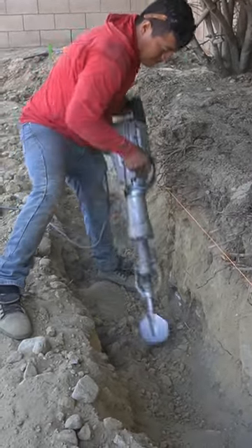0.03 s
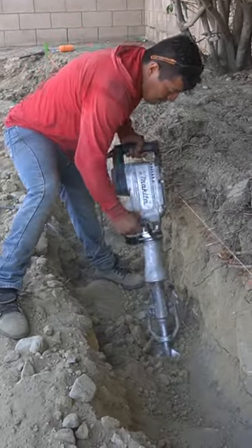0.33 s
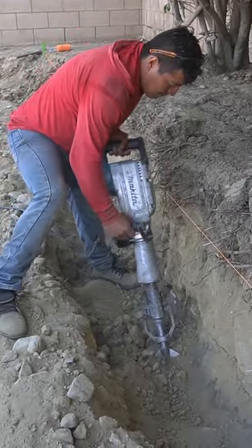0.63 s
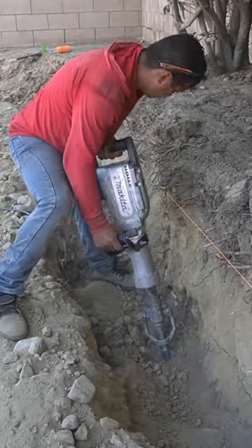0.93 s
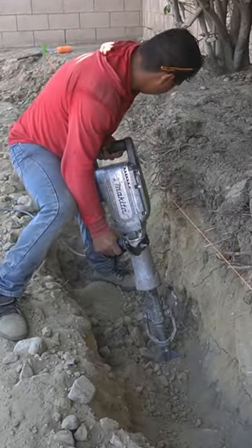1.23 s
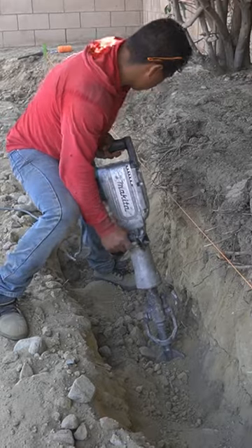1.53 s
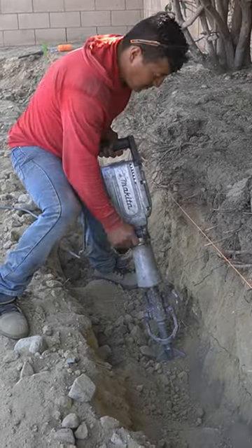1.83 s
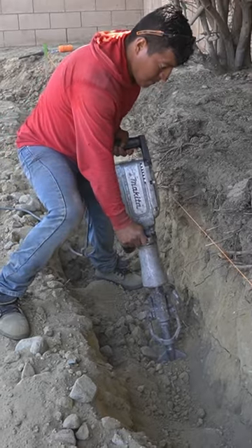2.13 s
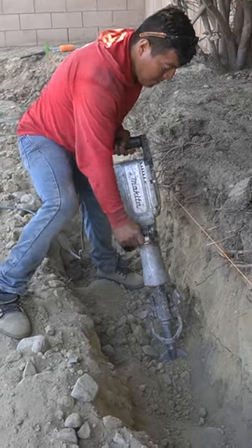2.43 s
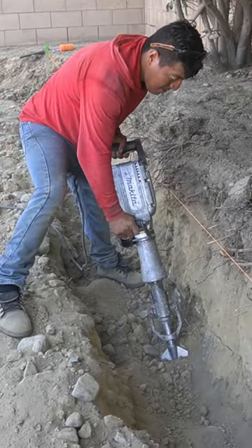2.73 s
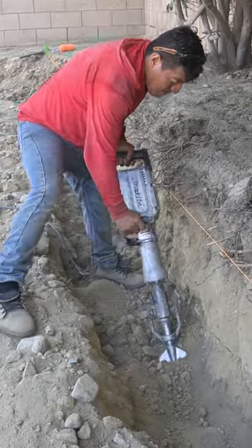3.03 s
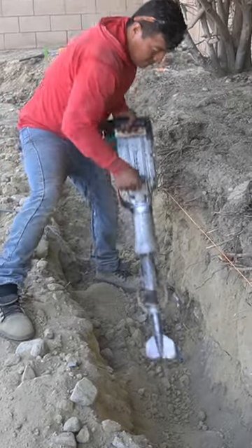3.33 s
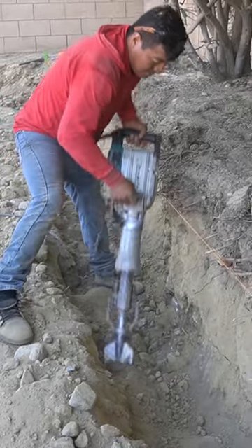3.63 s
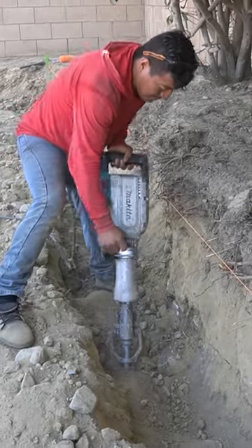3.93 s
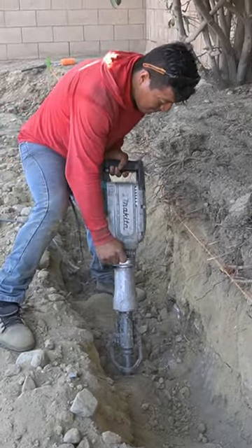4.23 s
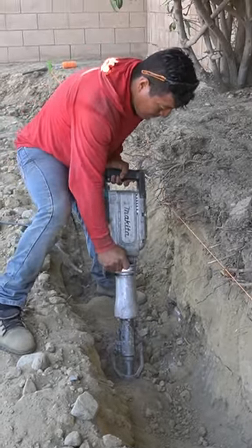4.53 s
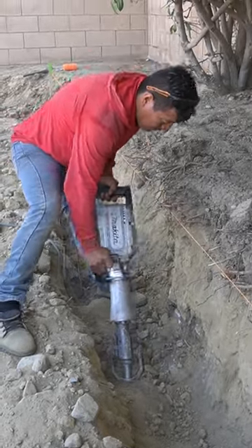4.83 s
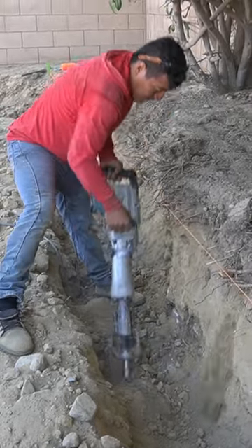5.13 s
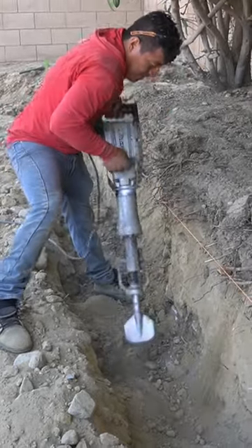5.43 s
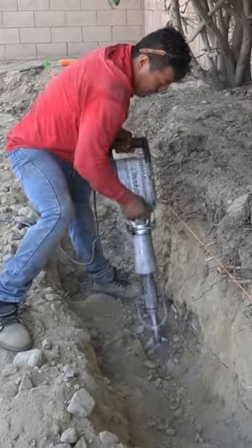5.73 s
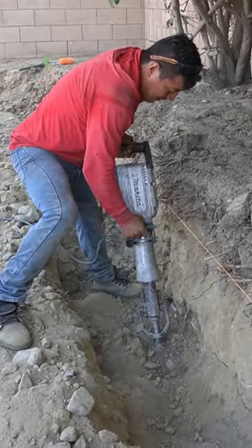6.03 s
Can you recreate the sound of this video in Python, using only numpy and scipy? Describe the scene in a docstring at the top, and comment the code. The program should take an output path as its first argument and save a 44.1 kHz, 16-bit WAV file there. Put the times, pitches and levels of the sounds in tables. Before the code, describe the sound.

An electric demolition hammer works close by in an outdoor trench, its motor rushing and whining over a low hum, perhaps a generator. From about 0.2 seconds it drives a steel spade into the soil at roughly twenty blows a second, each combining a sharp crack from the casing, a high metallic ring and a dull earthy thud. Near 3.3 seconds the spade clinks and the lifted hammer only clacks. Digging resumes at 3.7 seconds with softer thuds and a more damped ring. After 4.7 seconds the motor coasts through a few stray blows and clinks, and a flung clod lands with a hollow thump at about 5.1 seconds. The hammer then clacks rapidly in the air over a hollow roar and a stronger whine, before biting back into the ground at 5.7 seconds and pounding until the end, around 6 seconds.

```python
"""An electric demolition hammer rushes and whines over a hum, perhaps a generator's, then drives a steel
spade into a trench, about twenty blows a second: each cracks in the housing, rings the bit and thuds in
the soil. Near 3.3 s the spade clinks and the lifted hammer only clacks; from 3.7 s it digs again. After
4.7 s the motor coasts through stray blows and clinks, a flung clod lands, and the hammer clacks in the
air over a hollow roar before biting back in at 5.7 s."""
import sys
import numpy as np
from scipy import signal
from scipy.fft import rfft, irfft, next_fast_len
from scipy.io import wavfile
from scipy.ndimage import uniform_filter1d, minimum_filter1d, map_coordinates

SR = 44100
rng = np.random.default_rng(int(sys.argv[2]) if len(sys.argv) > 2 else 0)


def pcm_store(signal):
    """Save signal as 16-bit PCM."""
    levels = np.round(np.clip(np.atleast_2d(signal), -1, 1) * 32767)
    wavfile.write(sys.argv[1], SR, levels.astype(np.int16).T)


N = 267687
CLOCK = np.arange(N) / SR
AGE = np.arange(SR // 5) / SR  # time since an impact [s]

# Levels are relative: each layer adds its own trim.
# motor under changing load: (time [s], rush level [dB], gear whine pitch [Hz], whine level [dB])
MOTOR_CURVE = [(0, -26.5, 2625, -42), (.5, -31, 2123, -36), (2.5, -34.5, 2190, -45), (3.3, -38, 2350, -37),
               (3.66, -34, 2680, -46), (3.8, -35, 2393, -37), (4.55, -31.5, 2454, -37.5),
               (4.75, -41, 2320, -58), (4.94, -47, 2214, -49), (5.06, -34, 2255, -46),
               (5.28, -33.5, 2305, -28.5), (5.42, -33.5, 2336, -37), (5.66, -30, 2680, -41),
               (5.9, -31, 2430, -63)]
# fader rides for the nearby machine and the hollow roar: (time [s], level [dB])
HUM_LEVEL = [(.14, -37.5), (.28, -44), (.7, -51.5), (1.1, -46), (3.2, -48), (3.7, -42.5), (3.85, -47),
             (4.1, -41.5), (4.55, -44.5), (4.8, -40.5), (5.72, -36), (5.78, -48), (6.05, -41)]
ROAR_LEVEL = [(.15, -38.5), (.4, -54), (5.2, -55.5), (5.4, -44), (5.72, -42), (5.8, -67)]
# the hum's harmonics, from the fundamental up: (level [dB])
HUM_HARMONICS = [-14.5, -1, -20, -17.5]
# noise colours: (frequency [Hz], spectral level [dB])
FAN_EQ = [(150, -10), (650, -11), (1200, 1), (2400, 7.5), (3500, 7), (6500, 3.5), (10000, -4), (16000, -44)]
ROAR_EQ = [(400, -16), (610, 3), (850, -5), (1300, -11)]
RUMBLE_EQ = [(20, -60), (85, -2.5), (200, 0), (400, -14.5), (4000, -38)]
CLACK_EQ = [(150, -23), (650, 0), (1100, -6), (3700, -5.5), (5300, 6), (6000, -5.5), (6800, 3.5),
            (9500, -3.5), (16000, -10.5)]
CRACK_EQ = [(1200, -43), (2400, 4.5), (3600, 13.5), (5400, 10.5), (6800, 5), (8000, 11), (10500, 4),
            (12500, 10), (14000, -6), (16000, 11.5)]
CLANK_EQ = [(150, -21), (400, -12), (700, -8), (950, -3), (1200, -5.5), (1800, 3.5), (2300, 3.5),
            (3500, -7.5)]
SIZZLE_EQ = [(3000, -23.5), (3900, -1.5), (5700, -44), (6450, 13), (7400, -12), (11900, -9.5), (12500, 6),
             (13700, -10.5)]
# stereo image of all the noises: (frequency [Hz], left-right correlation [0..1])
STEREO_LIKENESS = [(100, 0.99), (1000, 0.96), (5000, 0.79)]

# striker tempo, one list per spell lifted or digging: (time [s], rate [strokes/s])
LIFTED_TEMPO = [
    [(.004, 25.6), (.06, 25.6)],
    [(3.349, 21.0), (3.66, 20.25)],
    [(5.152, 15.92), (5.24, 18.4), (5.45, 20.77), (5.59, 20.55)],
]
DIGGING_TEMPO = [
    [(.203, 27.55), (.248, 26.83), (.418, 22.07), (.598, 20.47), (1.3, 20.24), (1.45, 21.14), (1.55, 20.23),
     (3.27, 20.23)],
    [(3.718, 22.81), (4.05, 20.47), (4.53, 20.28), (4.66, 17.55)],
    [(5.74, 23.98), (5.95, 20.94), (6.07, 20.56)],
]
# clacks with the bit lifted: (time [s], level [dB])
CLACK_LEVEL = [(0, -51), (3.35, -23.5), (3.5, -17.5), (3.59, -28.5), (5.15, -18), (5.45, -15)]
# weight of the digging blows: (time [s], crack level [dB], ring level [dB])
BLOW_FORCE = [(.2, -15.5, -14), (.9, -26, -16.5), (1.08, -18, -14.5), (1.42, -16, -17),
              (1.52, -18.5, -11.5), (1.63, -19.5, -19), (2.08, -24, -16.5), (2.46, -21, -14.5),
              (2.74, -22, -15), (2.9, -22, -27), (3.1, -21, -21.5), (3.76, -22, -17.5),
              (4.08, -22.5, -18.5), (4.64, -20, -16.5), (5.8, -23, -18.5), (5.92, -20.5, -21.5)]
# stray blows as the bit catches, slips free or the motor coasts:
# (time [s], crack level [dB], clank level [dB], ring level [dB], upper-mode gain [dB], free time [s])
STRAY_BLOWS = [(.131, -24, -28, -28.5, 3, 0.049), (0.169, -23, -19, -21, 9.5, 0.0084),
               (3.291, -23.5, -27.5, -31.5, 13.5, 0.08), (3.676, -23.5, -29, -35, 4, 0.046),
               (4.698, -17.5, -22, -19.5, 7, 0.012), (4.774, -25, -24.5, -16, -4, 0.0085),
               (4.786, -30, -28.5, -28, 4, 0.014), (4.864, -26, -25.5, -10.5, -19, 0.002),
               (4.881, -27, -33, -23, -20, 0.003), (4.982, -27, -28.5, -27, -17, 0.0087),
               (5.083, -20, -23, -24.5, -3, 0.069), (5.686, -13, -19.5, -22.5, 7.5, 0.058),
               (5.712, -24, -26, -32, -5, 0.016)]

# modes of the steel bit, one list each for (family, pitch [Hz], level [dB], t60 [s])
MODE_FAMILY = "minor minor minor main main main main main minor minor upper upper upper minor".split()
MODE_HZ = [3629, 4325, 4753, 5151, 6157, 6437, 6700, 8524, 8940, 11700, 12230, 12332, 12572, 14460]
MODE_DB = [-14, -24, -28, -20.5, 0, -9.5, -26, -17, -15.5, -18, -15.5, -3.5, -19.5, -25]
MODE_T60 = [0.15, 0.52, 0.85, 0.23, 0.64, 0.35, 0.18, 0.4, 0.28, 0.53, 0.31, 0.24, 0.29, 0.49]
# how hard the striker excites the upper modes: (time [s], gain [dB])
UPPER_GAIN = [(.2, 0.5), (.33, -12), (.6, -1.5), (.81, 6), (1.02, -2.5), (1.5, -7.5), (1.65, 5), (2.1, 0),
              (2.78, 2), (2.95, 13.5), (3.72, 9.5), (3.9, -0.5), (4.35, 0), (4.45, 1.5), (4.6, -4.5),
              (5.9, 6)]
# the minor modes fade when the spade is buried: (time [s], gain [dB])
MINOR_GAIN = [(.2, -3.5), (1.35, -1), (2.7, 0.5), (2.92, 4), (3.2, 7.5), (3.9, -6), (4.7, -15), (5.08, 3),
              (5.8, -6)]
# the tool's angle brings out one mode: (time [s], half-width [s], pitch [Hz], gain [dB])
MODE_SWELLS = [(.84, 0.049, 4750, 21), (1.247, 0.22, 5150, 13), (2.5, 0.063, 5150, 11),
               (5.08, 0.067, 8520, 12), (5.91, 0.059, 5150, 15)]
# packed soil damps all but the upper family: (time [s], extra decay [dB/s])
SOIL_DAMPING = [(.8, 0), (1.6, 53), (3.3, 52), (4.0, 220), (4.9, 420), (5.08, 110)]
# how long the bit rings before it seats: (time [s], free time [s])
FREE_TIME = [(.2, 0.11), (.44, 0.043), (.52, 0.036), (1.45, 0.035), (1.65, 0.032), (2.2, 0.027),
             (2.45, 0.041), (2.7, 0.022), (3.0, 0.029), (3.15, 0.042), (3.9, 0.028), (4.64, 0.031),
             (5.8, 0.029)]
# the seated bit stiffens and bends sharp, most in hard crust: (time [s], typical pitch rise [Hz])
SEAT_BEND = [(.8, 500), (1.05, 120), (4.0, 50)]
# the ring pans as the tool turns: (time [s], left minus right [dB])
RING_PAN = [(2.7, -5), (3.8, 3.5), (5.0, 1)]
# the bit pings higher while the striker touches it: (time [s], level [dB])
PING_LEVEL = [(2.5, 19), (5.6, 9.5), (5.75, 24)]
# the spade's push on the ground: (time [s], level [dB])
THUD_LEVEL = [(.14, -41), (.21, -26.5), (1.1, -21), (3.0, -21.5), (3.255, -21.5), (3.285, -43), (3.75, -35),
              (4.5, -29.5), (6.0, -29.5)]
# clinks of the loose spade: (time [s], pitch [Hz], level [dB], t60 [s])
SPADE_CLINKS = [(3.244, 3580, -25, 0.13), (3.29, 3100, -22, 0.042), (4.862, 1760, -17.5, 0.032),
                (5.082, 2550, -14.5, 0.033), (5.084, 3800, -12, 0.021)]


def amp(db):
    """Decibels to gain."""
    return 10 ** (np.asarray(db) / 20)


def unit(x):
    """Scale to rms 1."""
    return x / np.sqrt(np.mean(x ** 2) + 1e-20)


def along(points, hz):
    """Read a curve along a log frequency axis."""
    frequencies, values = np.transpose(points)
    return np.interp(np.log(hz + 1), np.log(frequencies + 1), values)


def at(rows, s, column=1):
    """Read one column of a curve at the times s."""
    columns = np.transpose(rows)
    return np.interp(s, columns[0], columns[column])


def wobble(rate, size=N):
    """Smooth random modulation, rate knots a second."""
    return map_coordinates(rng.standard_normal(int(size * rate / SR) + 4), [np.arange(size) * rate / SR])


def filtered(x, response):
    """Equalise x with a gain for each frequency."""
    size = next_fast_len(N + SR // 2)
    return irfft(rfft(x, size) * response(np.fft.rfftfreq(size, 1 / SR)), size)[..., :N]


def noise(eq, patchy_db):
    """Stereo noise of rms 1 whose colour shifts from moment to moment."""
    def mid_side_gain(hz):
        width = np.arccos(np.clip(along(STEREO_LIKENESS, hz), -1, 1)) / 2
        return amp(along(eq, hz)) * [np.cos(width), np.sin(width)]

    white = signal.stft(rng.standard_normal((2, N)), nperseg=512)[2]
    patches = uniform_filter1d(rng.standard_normal(white.shape[1:]), size=5, axis=0)
    patches = unit(uniform_filter1d(patches, size=6, axis=1))
    pair = signal.istft(white * amp(patchy_db * patches), nperseg=512)[1][:, :N]
    mid, side = filtered(pair, mid_side_gain)
    return unit(np.array([mid + side, mid - side]))


def add(track, s, sound):
    """Mix a sound into a track at time s."""
    start = int(np.clip(round(s * SR), 0, N - 1))
    track[..., start:start + sound.shape[-1]] += sound[..., :N - start]


def hit(db, rise, t60, t=AGE):
    """Percussive envelope: fast attack, exponential decay."""
    return amp(db - 60 * t / t60) * (1 - np.exp(-t / rise))


def bursts(times, levels, rise, t60, tail_db, tail_t60):
    """Envelope of impacts: each a quick burst, then a weaker scatter from the trench."""
    power = np.zeros(N)
    shape = hit(0, rise, t60) + hit(tail_db, rise, tail_t60)
    for s, db in zip(times, levels):
        add(power, s, (amp(db) * shape) ** 2)
    return np.sqrt(power)


def motor(rush_db, whine_db, whine_width_hz, chatter_db, hiss_hz=3500, dull_below_db=-31):
    """Fan air chopped by gear chatter, duller when coasting, and a fuzzy whine that sags under load."""
    air, level_db = noise(FAN_EQ, patchy_db=3.0), at(MOTOR_CURVE, CLOCK)
    hiss = filtered(air, lambda hz: hz ** 4 / (hz ** 4 + hiss_hz ** 4))
    air = air - hiss * (1 - amp(np.minimum(0, level_db - dull_below_db)))
    rush = amp(level_db + rush_db + chatter_db * wobble(240)) * air
    whine_hz = at(MOTOR_CURVE, CLOCK, column=2) + whine_width_hz * wobble(350)
    whine_gain = amp(at(MOTOR_CURVE, CLOCK, column=3) + whine_db + 4.1 * wobble(24.88))
    return rush + whine_gain * np.sin(2 * np.pi * np.cumsum(whine_hz) / SR)


def vents(patchy_db):
    """Air, probably from the vents, roars in a hollow band while the motor runs free."""
    return amp(at(ROAR_LEVEL, CLOCK)) * noise(ROAR_EQ, patchy_db)


def hum(hz, tone_db, rumble_db):
    """A machine drones at a nearly steady speed over a low rumble that swells less than it does."""
    phase = 2 * np.pi * np.cumsum(hz * (1 + 0.00364 * wobble(3.95))) / SR
    tone = sum(amp(db + wobble(11.0)) * np.sin(k * phase + rng.uniform(0, 2 * np.pi))
               for k, db in enumerate(HUM_HARMONICS, 1))
    level_db = at(HUM_LEVEL, CLOCK)
    rumble = amp(level_db / 2 + rumble_db) * noise(RUMBLE_EQ, patchy_db=0.5)
    return amp(level_db + tone_db) * tone + rumble


def strokes(spells):
    """Stroke times: one for each turn of the crank."""
    times = []
    for tempo in spells:
        t = np.arange(tempo[0][0], tempo[-1][0], 1 / SR)
        turns = np.cumsum(at(tempo, t)) / SR
        times.append(np.interp(np.arange(np.ceil(turns[-1])), turns, t))
    return np.concatenate(times)


def idle_strokes(scrape_db, snap_db):
    """With no load the striker scrapes into its catch and stops with a snap."""
    s = strokes(LIFTED_TEMPO)
    db = at(CLACK_LEVEL, s)
    scrape = bursts(s, db + scrape_db, rise=0.0013, t60=0.014, tail_db=-17.0, tail_t60=0.17)
    snap = bursts(s + 0.00274, db + snap_db, rise=.0001, t60=0.0044, tail_db=-42, tail_t60=.02)
    return np.hypot(scrape, snap) * noise(CLACK_EQ, patchy_db=1.0)


def hammering(clank_db, crack_scatter_db, ring_scatter_db, free_scatter):
    """Cue list of all blows, laid out like STRAY_BLOWS; no two steady ones land quite alike."""
    s = strokes(DIGGING_TEMPO)
    hardness, liveliness, seating = rng.standard_normal((len(s), 3)).T
    crack = at(BLOW_FORCE, s) + crack_scatter_db * hardness
    ring = at(BLOW_FORCE, s, column=2) + ring_scatter_db * liveliness
    free_s = at(FREE_TIME, s) * np.exp(free_scatter * seating)
    steady = np.column_stack([s, crack, crack + clank_db, ring, at(UPPER_GAIN, s), free_s])
    blows = np.vstack([steady, STRAY_BLOWS])
    return blows[np.argsort(blows[:, 0])]


def housing(blows, crack_db, rebound_db, rebound_s):
    """Blows crack and clank in the casing; the striker rattles again on its way back."""
    s, crack, clank, *_ = blows.T
    sharp = bursts(s, crack + crack_db, rise=0.00048, t60=0.012, tail_db=-14.0, tail_t60=0.18)
    dull = bursts(s, clank, rise=0.00073, t60=0.037, tail_db=-9.5, tail_t60=0.2)
    lag, force = rng.standard_normal((len(s), 2)).T
    rattle_db = at(THUD_LEVEL, s) / 2 + rebound_db + 3 * force
    rattle = bursts(s + rebound_s + 0.0095 * lag, rattle_db,
                    rise=0.00051, t60=0.11, tail_db=-15, tail_t60=0.093)
    cracks = np.hypot(sharp, rattle) * noise(CRACK_EQ, patchy_db=2.0)
    return cracks + dull * noise(CLANK_EQ, patchy_db=2.0)


def swell(s, hz, width_hz=210):
    """Boost [dB] that the tool's angle gives the modes at hz for a blow at time s."""
    return sum(db * np.exp(-((s - when) / length) ** 2 - ((hz - near) / width_hz) ** 2)
               for when, length, near, db in MODE_SWELLS)


def contact_ping(s, t, ring_db, touch, hz=6406):
    """The steel pings while the striker touches it, louder when the ring is strong."""
    envelope = hit(at(PING_LEVEL, s) + 0.73 * ring_db, rise=0.0023, t60=0.0088, t=t)
    return envelope * np.sin(2 * np.pi * hz * (1 + 0.016 * touch) * t)


def bit(blows, main_db, upper_db, scatter_db, upper_scatter_db, choke_db, seat_s, grip_s,
        phase_rough, detune_hz, spread_rad, pan_scatter_db, sizzle_db):
    """Each blow restarts the steel's modes; as the bit seats, the ring bends up, sizzles and chokes."""
    out, chatter = np.zeros((2, N)), np.zeros(N)
    hz, mode_db, t60 = np.array([MODE_HZ, MODE_DB, MODE_T60])[:, :, None]
    upper, minor = (np.array(MODE_FAMILY)[:, None] == name for name in ("upper", "minor"))
    modes = hit(mode_db, rise=0.001, t60=t60) * np.exp(2j * np.pi * hz * AGE)
    weak = np.clip(-mode_db / 10, .35, 1)  # weak modes depend most on how the striker lands
    beamed = np.abs(hz - hz[np.argmax(mode_db)]) < 700  # the strongest cluster radiates to one side
    following = np.append(blows[1:, 0], N / SR + 1)
    for (s, _, _, ring_db, bright_db, free_s), next_s in zip(blows, following):
        size = min(len(AGE), int((next_s - s + .003) * SR))
        t = AGE[:size]
        landing, side, skew, detune = rng.standard_normal((4, len(hz), 1))
        press, touch, edge = rng.standard_normal(3)
        family_db = np.where(upper, bright_db + upper_db + upper_scatter_db * edge,
                             main_db + at(MINOR_GAIN, s) * minor)
        damping_db = at(SOIL_DAMPING, s) * t * ~upper
        strength = amp(ring_db + family_db + swell(s, hz) + weak * scatter_db * landing - damping_db)
        seated = (1 + np.tanh((t - free_s) / seat_s)) / 2
        gripped = (1 + np.tanh((t - free_s - grip_s) / grip_s)) / 2
        handover = np.clip(1 - (s + t - next_s) / 0.0018, 0, 1)  # the next blow cuts this ring off
        gate = amp(-choke_db * gripped ** 2) * handover
        # rubbing in the holder detunes each mode and roughens its phase
        drift = np.cumsum(rng.standard_normal((len(hz), len(AGE))), axis=1)[:, :size] / np.sqrt(SR)
        rub = weak * (phase_rough * drift + 2 * np.pi * detune_hz * detune * t)
        bend_hz = at(SEAT_BEND, s) * (1 + 0.244 * press)
        bend = 2 * np.pi * np.cumsum(bend_hz * seated ** 2) / SR
        ring = strength * gate * modes[:, :size] * np.exp(1j * (rub + bend * (beamed | upper)))
        pan_db = at(RING_PAN, s) * beamed + pan_scatter_db * side
        pan = amp(pan_db / 2) * np.exp(1j * spread_rad * (1 + skew))
        stereo = np.array([ring * pan, ring / pan]).sum(axis=1).imag
        add(out, s, stereo + contact_ping(s, t, ring_db, touch))
        add(chatter, s, amp(ring_db + sizzle_db) * gate * (1 + seated))  # the bit shakes in its holder
    return out + chatter * noise(SIZZLE_EQ, patchy_db=4.5)


def soil(times, thud_hz, t60, sag, sag_s, delay_s, grit_db, knock_hz, knock_db, knock_t60):
    """The spade shoves the earth: a gritty thud whose pitch sags as soil yields, and a dull knock."""
    out = np.zeros(N)
    cycles = thud_hz * np.cumsum(1 + sag * np.exp(-AGE / sag_s)) / SR
    for s in times:
        weight, thud_tune, knock_tune = rng.standard_normal(3)
        thud = np.sin(2 * np.pi * cycles * (1 + .02 * thud_tune)) * hit(0, rise=0.0032, t60=t60)
        knock = np.sin(2 * np.pi * knock_hz * (1 + 0.022 * knock_tune) * AGE)
        knock *= amp(knock_db - 60 * AGE / knock_t60)
        add(out, s + delay_s, amp(at(THUD_LEVEL, s) + .5 * weight) * (thud + knock))
    return out * (1 + amp(grit_db) * wobble(900))


def clinks(rough_rad):
    """The loose spade taps its retainer or a stone: short metallic notes."""
    out = np.zeros(N)
    for s, hz, db, t60 in SPADE_CLINKS:
        tone = np.sin(2 * np.pi * hz * AGE + rough_rad * wobble(510, size=len(AGE)))
        add(out, s, hit(db, rise=0.00016, t60=t60) * tone)
    return out


def clod(s, db, hz, t60):
    """A flung clod lands with a hollow thump."""
    out = np.zeros(N)
    tone = np.sin(2 * np.pi * hz * AGE + .5 * wobble(115, size=len(AGE)))
    add(out, s, hit(db, rise=0.0011, t60=t60) * tone)
    return out


def limiter(x, ceiling_db):
    """The gain ducks for a few milliseconds around peaks that pass the ceiling."""
    needed = np.minimum(1, amp(ceiling_db) / (np.abs(x).max(axis=0) + 1e-9))
    return x * uniform_filter1d(minimum_filter1d(needed, size=400), size=300)


def scene():
    """The mix: steel, casing and ground up front, over a bed of motor and hum."""
    blows = hammering(clank_db=-5.0, crack_scatter_db=2, ring_scatter_db=1, free_scatter=0.144)
    steel = bit(blows, main_db=2.5, upper_db=-0.5, scatter_db=4.5, upper_scatter_db=3.0,
                choke_db=17.5, seat_s=.007, grip_s=.007, phase_rough=6.0, detune_hz=7.8,
                spread_rad=0.28, pan_scatter_db=2.5, sizzle_db=-16)
    steel += clinks(rough_rad=0.6)
    casing = housing(blows, crack_db=8.5, rebound_db=-23.5, rebound_s=0.0328)
    casing += idle_strokes(scrape_db=4.5, snap_db=3)
    ground = soil(blows[:, 0], thud_hz=257, t60=0.025, sag=0.42, sag_s=0.0027, delay_s=0.001,
                  grit_db=-11.0, knock_hz=910, knock_db=-20, knock_t60=0.051)
    ground += clod(s=5.145, db=-17.0, hz=222, t60=0.096)
    drive = motor(rush_db=-6.5, whine_db=-5.5, whine_width_hz=112.3, chatter_db=3.0)
    drive += vents(patchy_db=2.0)
    return steel + casing + ground + drive + hum(hz=60.5, tone_db=4.0, rumble_db=-25.5)


def record(dry):
    """Master chain: limit the peaks, then cut the very top of the treble."""
    return filtered(limiter(dry, ceiling_db=-4.0), lambda hz: hz < 15780)


dry = scene()
out = record(dry)
pcm_store(out)
```